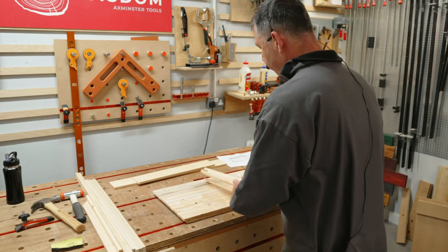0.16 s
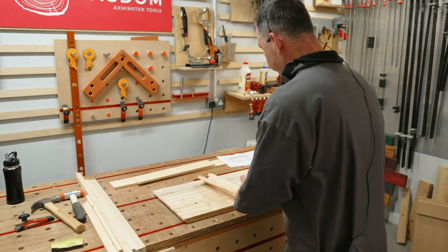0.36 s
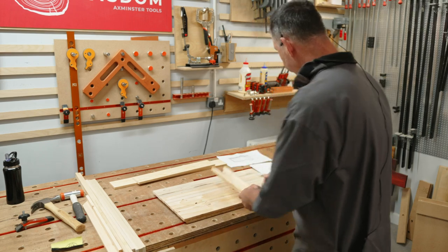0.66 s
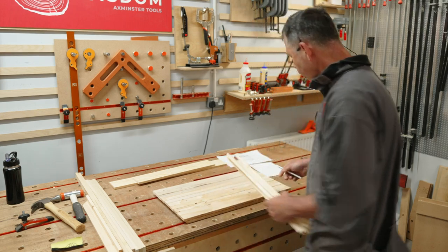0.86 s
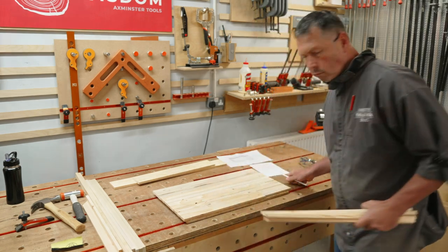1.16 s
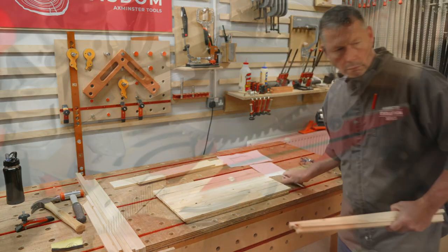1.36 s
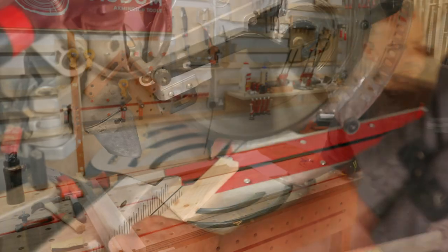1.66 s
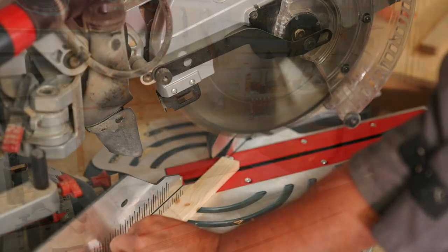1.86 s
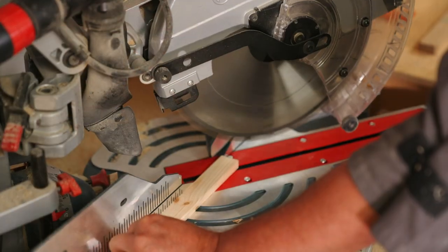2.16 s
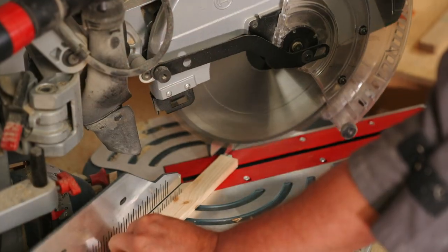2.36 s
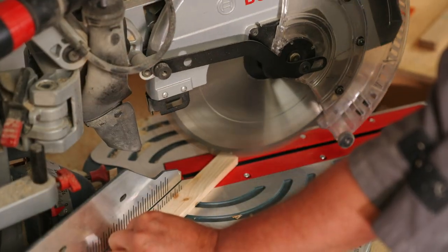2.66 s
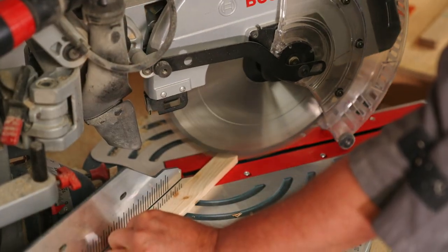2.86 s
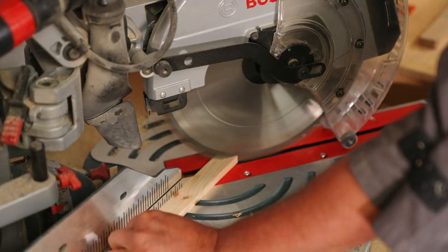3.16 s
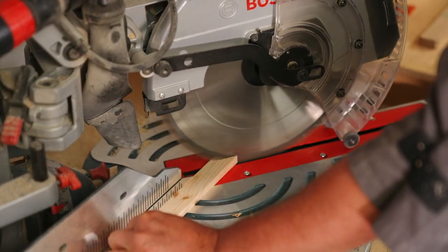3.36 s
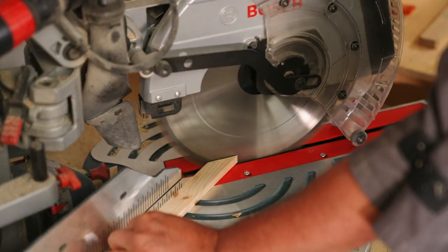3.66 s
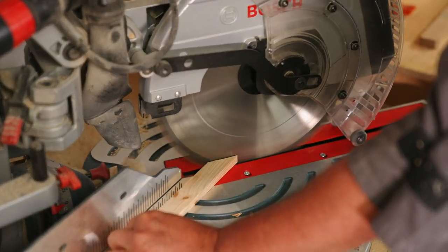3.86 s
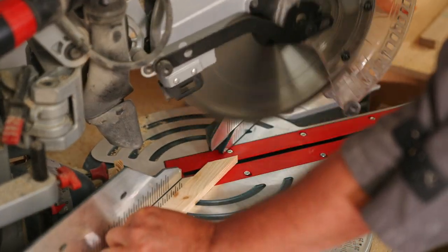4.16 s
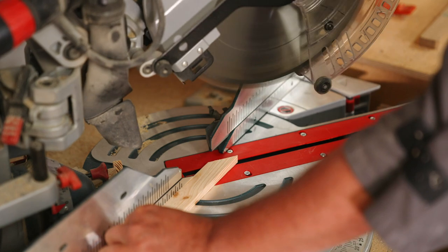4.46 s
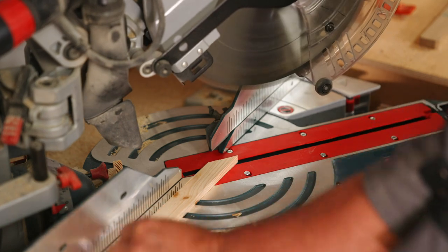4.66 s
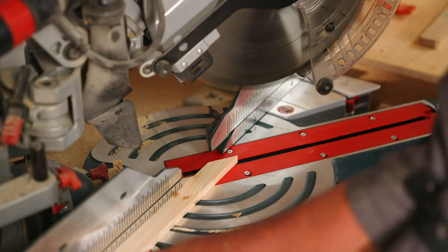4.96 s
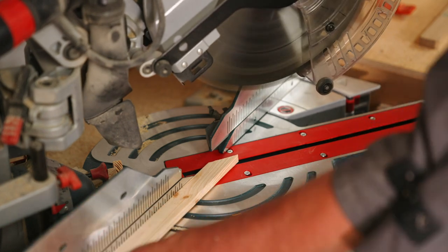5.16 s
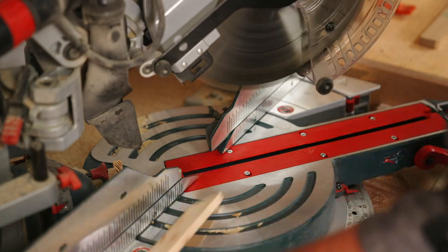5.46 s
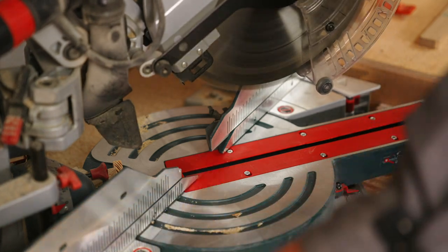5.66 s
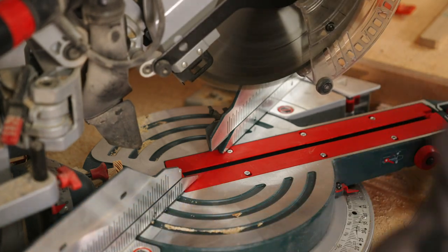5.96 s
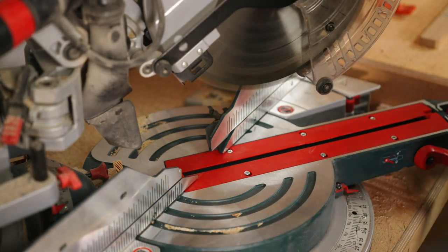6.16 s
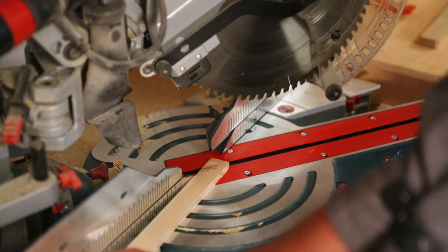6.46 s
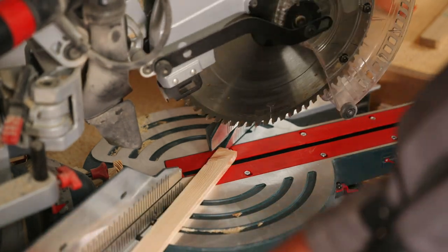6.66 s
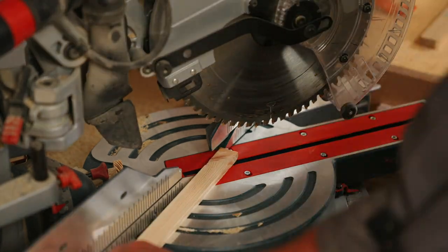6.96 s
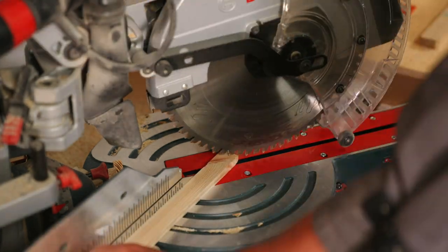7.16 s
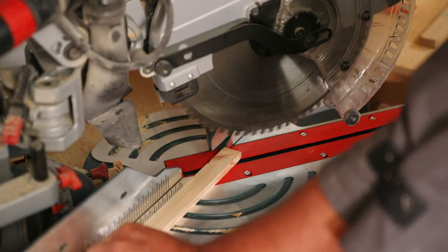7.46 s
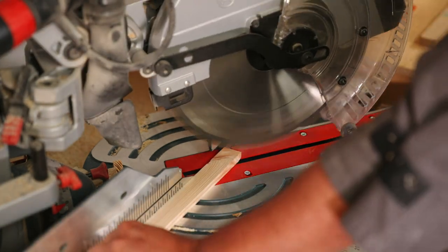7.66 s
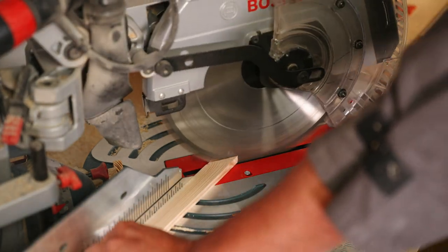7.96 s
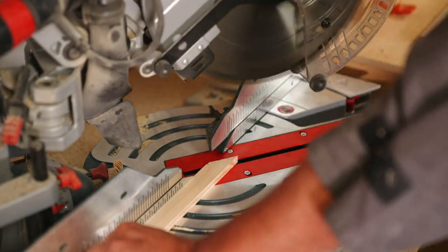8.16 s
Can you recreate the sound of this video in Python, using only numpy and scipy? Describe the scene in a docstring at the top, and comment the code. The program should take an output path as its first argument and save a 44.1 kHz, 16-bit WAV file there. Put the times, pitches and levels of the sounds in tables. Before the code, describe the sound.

In a small, lightly echoing workshop, wooden strips clack on a bench while shoes scuff and a jacket rustles. A dust extractor swells into a steady roar and a mitre saw grinds up to a whine. It bites through wood with a harsh bright rasp, runs free, then winds down. Dry clicks follow; abruptly everything races at five times speed, high-pitched, with another brief cut. The sound is identical in both channels, the loud saw audibly squashed.

```python
"""In a woodworking shop, wooden strips clatter on a bench and shoes scuff the floor as a dust extractor starts to roar.
A mitre saw spins up, bites through wood, runs free and winds down; gain control ducks loud sound at the saw.
Then everything plays five times as fast, as a time-lapse: the extractor, more clicks and a second cut.
Rotating parts are sums of lines that follow the blade's turns, air and friction are shaped noise, and
blows are short noise bursts or decaying modes."""
import sys
import numpy as np
from scipy import signal
from scipy.fft import rfft, irfft, next_fast_len
from scipy.io import wavfile
from scipy.ndimage import uniform_filter1d, minimum_filter1d

SR = 44100
rng = np.random.default_rng(int(sys.argv[2]) if len(sys.argv) > 2 else 0)


def file_out(sig):
    """Save sig as 16-bit WAV at sys.argv[1]."""
    # one column per channel
    cols = np.atleast_2d(sig).T
    # limit, then scale
    lim = np.clip(cols, -1, 1)
    pcm = np.round(lim * 32767).astype(np.int16)
    wavfile.write(sys.argv[1], SR, pcm)


N = 366030

LAPSE_AT, LAPSE_PACE = 6.257, 5  # s as heard, speed-up factor
LAPSED_S = LAPSE_PACE * (N / SR - LAPSE_AT)
T = np.arange(round((LAPSE_AT + LAPSED_S) * SR) + 8) / SR  # workshop time in s, before the speed-up

GEAR_TEETH, PINION_TEETH = 41, 5
ARMATURE = GEAR_TEETH / PINION_TEETH  # armature turns per blade turn
FREE_TURNS_PER_S = 62.15  # free speed of the blade
HUM_HZ = 100

# trigger holds, in s as heard, with levels of the starting noises: pressed_s, released_s, buzz_db, grind_db
RUNS = [(1.6689, 4.351, -12.5, -7.5), (7.552, 8.226, 1.5, 7.5)]


def rotation(drag, jitter=0.000505):
    """Rotational inertia: the blade's turns per s rise, sag late under load and coast down; their integral is turns."""
    spin_up_s, spin_up_shape = 0.621, 1.274
    coast_s, coast_shape = 0.497, 9.7
    share = np.zeros(len(T))
    for pressed, released, *_ in RUNS:
        on, off = workshop_time(pressed), workshop_time(released)
        spin_up = 1 - np.exp(-(np.maximum(T - on, 0) / spin_up_s) ** spin_up_shape)
        coast = (1 + np.maximum(T - off, 0) / (coast_s * coast_shape)) ** -coast_shape
        share += spin_up * coast
    sag = 1 - lagged(drag, lag_s=0.289)
    speed = FREE_TURNS_PER_S * share * sag * (1 + jitter * wander(18.0))
    return speed, np.cumsum(speed) / SR


def feed():
    """Loading by the workpiece: contact 0-1, strength of the cut, and a drag that grows through it."""
    # blade in the wood, in s as heard: enters_s, leaves_s, level_db, entering and leaving speed loss [share]
    wood_cuts = [(2.725, 3.745, 5, 0.05, .099), (7.772, 8.089, 7.5, 0.042, 0.15)]
    entry_s = 0.06  # the teeth sink in and come free over this time
    contact, strength, drag = np.zeros((3, len(T)))
    for enters, leaves, db, first_sag, last_sag in wood_cuts:
        start, end = workshop_time(enters), workshop_time(leaves)
        inside = np.clip(.5 + np.minimum(T - start, end - T) / entry_s, 0, 1)
        contact += inside
        strength += inside * gain_of(db + np.interp(T, [start, end], [0, -1]))  # quietens by 1 dB
        drag += inside * np.interp(T, [start, end], [first_sag, last_sag])
    return contact, strength, drag


def gear_loads(speed, cutting):
    """Tooth loading: shares of speeding up, cutting, running free, coasting fast and coasting slowly."""
    accel = uniform_filter1d(np.gradient(speed) * SR, size=4000)  # turns per s, per s
    rising = np.clip(accel / 14 - 1, 0, 1)
    braking = np.clip(-accel / 2, 0, 1)
    slow = np.clip(2 - speed / (0.24 * FREE_TURNS_PER_S), 0, 1)
    unloaded = 1 - cutting
    free = unloaded * (1 - rising - braking)
    coasting = unloaded * braking
    loads = np.array([unloaded * rising, cutting, free, coasting * (1 - slow), coasting * slow])
    return loads, rising, braking


def gears(speed, turns, cutting, runout=0.17, hunting=0.0074, coast_hunting=0.38, chatter_pulsing=0.28):
    """Gear-mesh excitation: mesh and fan lines pass the housing's resonances, with balance set by tooth load."""
    # relative line levels; fives are the gear mesh, eleven is the fan: multiple of the armature speed,
    # speeding_up_db, cutting_db, free_db, coasting_fast_db, coasting_slow_db
    whine_lines = [(5, -44.5, -47, -65, -38, -44.5), (6, -55, -74, -59, -56, -68),
                   (9.5, -64, -50, -50, -53, -76), (10, -45.5, -37, -38, -45, -42.5),
                   (11, -66, -46, -44, -49, -56), (15, -45.5, -44.5, -42, -42.5, -49),
                   (16, -61, -47, -75, -70, -52), (20, -50.5, -55, -54, -50, -42.5),
                   (25, -55, -66, -61, -68, -45.5), (30, -58, -69, -71, -64, -53)]
    # how well the housing radiates the whine: pitch_hz, level_db
    housing = [(200, -26), (440, 1), (580, 6.5), (700, -0.5), (830, 1), (1180, -1.5), (1380, -8),
               (1600, -4), (1870, 2.5), (2150, 0.5), (2500, -1.5), (3250, -5), (3750, -12), (4200, -4),
               (4620, 2), (4820, 6), (4980, -8.5), (5110, 8), (5350, 0.5), (5550, -5), (6200, 6),
               (7400, -2.5), (8700, 1), (10000, -8.5), (14000, -29)]
    # unloaded gears chatter in their backlash and ring the gear case: pitch_hz, relative level_db per Hz
    chatter_spectrum = [(100, -140), (1000, -100), (2200, -91), (2850, -70.5), (3500, -78), (4200, -89),
                        (4850, -71), (5500, -86), (7000, -85.5), (9000, -100)]
    loads, rising, braking = gear_loads(speed, cutting)
    free = loads[2]
    # cutting presses the gears together; unloaded they rattle and hunt in their backlash
    rough = np.dot([.3, .25, 1.8, .45, .45], loads)
    loose_turns = turns + hunting * (free + coast_hunting * braking) * wander(16.4)
    # gliding lines cross the room's nulls
    fading_db = 1.06 + 1.8 * (1 - cutting) * (rising + braking)
    whine = np.zeros(len(T))
    for multiple, *load_db in whine_lines:
        order = multiple * ARMATURE
        db = np.dot(load_db, loads) + read(housing, order * speed)[0]
        whine += partial(order * loose_turns, db, rough, flutter_hz=54.98, fading_db=fading_db, fading_hz=14)
    once_a_turn = np.sin(2 * np.pi * turns)
    chatter = noise(lambda hz, t: read(chatter_spectrum, hz)[0], len(T), patchy_db=-0.5)
    chatter *= (1 + chatter_pulsing * once_a_turn) * free * (speed / FREE_TURNS_PER_S) ** 4
    driven = loudness(speed, free_db=6.33, octave_db=5, faint_share=0.33)
    coasting = loudness(speed, free_db=5.2, octave_db=3.4, faint_share=0.18)
    level = (1 - braking) * driven + braking * coasting
    return (whine + chatter) * level * (1 + runout * once_a_turn)


def singing(speed, turns):
    """Plate resonance: the blade flares into a rough whistle as it speeds up through a critical speed."""
    critical, half_width = 47.5, 2.5  # turns per s
    nearness = np.exp(-np.minimum(((speed - critical) / half_width) ** 2, 50))
    speeding_up = np.gradient(lagged(speed, .1)) > 0
    whistle = partial(16 * ARMATURE * turns, db=-35, rough=1.8, flutter_hz=106.3)
    return nearness * speeding_up * whistle


def teeth(speed, turns, strength, wobble=0.17):
    """Periodic impact: left and right bevelled teeth strike in pairs, and blade slots add a comb of lines between."""
    # relative sound of the cut: pitch_hz, tooth_line_db, slot_line_db, rasp_db per Hz
    cut_spectrum = [(30, -90, -90, -135), (300, -75, -69, -110), (1610, -57, -62.5, -89.5),
                    (2150, -53.5, -64.5, -83.5), (4080, -48, -52, -86), (5560, -45, -56, -82.5),
                    (6200, -45.5, -46.5, -76), (8200, -44.5, -56, -74), (9820, -48.5, -64, -78.5),
                    (12000, -52, -79, -87), (14400, -53, -76, -95), (16000, -65, -78, -97)]
    blade_teeth, blade_slots = 72, 4
    full_speed = np.average(speed, weights=strength ** 2)
    biting = strength > 0
    cut_turns = turns[biting]
    lines = 0
    for order in range(7 * blade_slots, 4 * blade_teeth - 8 * blade_slots, blade_slots):
        tooth_db, slot_db, _ = read(cut_spectrum, order * full_speed)
        db = slot_db if order % (blade_teeth // 2) else tooth_db
        lines = lines + partial(order * cut_turns, db, rough=.7, flutter_hz=34, fading_db=4.5, fading_hz=9)
    rasp = noise(lambda hz, t: read(cut_spectrum, hz)[2], 4 * SR, patchy_db=3.0)
    rubbing = 1 + wobble * np.sin(2 * np.pi * cut_turns)  # the blade rubs harder once a turn
    out = np.zeros(len(T))
    out[biting] = lines + np.resize(rasp, len(lines)) * rubbing
    return out * strength


def air(speed, turns, throb=0.031, dulling_db=5):
    """Aerodynamic noise: blade and fan stir the air, duller at low speed and throbbing with each turn."""
    # relative spectrum of the stirred air: pitch_hz, level_db per Hz
    stirred_air = [(30, -145), (100, -117), (220, -100), (275, -86), (305, -81.5), (350, -82.5),
                   (690, -78.5), (950, -81.5), (1700, -82), (2350, -73), (2900, -72.5), (3400, -77),
                   (4300, -77), (4950, -74), (5800, -78), (7200, -79), (8200, -88.5), (15500, -101)]

    def colour(hz, t):
        slowness = 1 - np.interp(t, T, speed) / speed.max()
        return read(stirred_air, hz)[0] - dulling_db * slowness * np.log2(np.maximum(hz, 500) / 2500)
    rush = noise(colour, len(T), patchy_db=0.47)
    level = loudness(speed, free_db=10.7, octave_db=19, faint_share=0.08)
    return rush * level * (1 + throb * np.sin(2 * np.pi * turns))


def bearing(speed, turns):
    """Ball-pass vibration: the spindle bearing drones 5.3 times a turn and shows only near full speed."""
    return partial(5.3 * turns, db=-53.5, rough=.3, flutter_hz=5.4) * (speed / FREE_TURNS_PER_S) ** 4


def buzz(speed, pulsing=0.35):
    """Magnetic forces: a faint mains hum; at each start surging current makes iron buzz and gears grind upwards."""
    # relative spectrum of the starting motor: pitch_hz, level_db per Hz
    grind_spectrum = [(30, -135), (100, -105), (300, -85), (550, -73.5), (780, -69.5), (1300, -68.5),
                      (2200, -70), (3100, -75), (8000, -100)]
    # the motor's iron, one row per multiple of the hum: relative level_db
    iron_db = [-57.5, -52, -53, -47.5, -61, -43, -49.5, -51]
    # the starting current surges, fades and is switched over
    rise_s, fade_s, soft_start_s = 0.1, 0.42, 0.96
    out = gain_of(-82.5) * np.sqrt(2) * np.sin(2 * np.pi * HUM_HZ * T)
    t = T[:2 * SR]
    current = (1 - np.exp(-t / rise_s)) * np.exp(-t / fade_s)
    current *= np.clip((soft_start_s - t) / rise_s, 0, 1)
    for pressed, _, buzz_db, grind_db in RUNS:
        start = workshop_time(pressed)

        def colour(hz, s):
            # strongest in a 332 Hz wide band that climbs with the gear mesh
            mesh_hz = GEAR_TEETH * np.interp(start + s, T, speed)
            return read(grind_spectrum, hz)[0] + 9 * resonance(hz, mesh_hz, 332)
        iron = sum(partial((k + 1) * HUM_HZ * t, buzz_db + db, rough=0.069, flutter_hz=12,
                           fading_db=4.0, fading_hz=4.8) for k, db in enumerate(iron_db))
        grind = noise(colour, len(t), patchy_db=-0.5) * (1 + pulsing * np.cos(2 * np.pi * HUM_HZ * t))
        add(out, start, current * (iron + gain_of(grind_db) * grind))
    return out


def clicks():
    """Impact excitation: clacks and squeaks of switch, guard and workpiece sound the saw table's modes."""
    # start in s as heard, the rest in workshop time: start_s, level_db, centre_hz, spread [octaves], rise_s, t60_s
    click_events = [(1.686, -38.5, 2870, 1.5, 0.0053, 0.44), (1.689, -33, 5410, 0.067, 0.0044, 0.24),
                    (1.69, -29, 8400, 0.078, 0.0049, 0.088), (5.8533, -10.5, 4100, 1.3, 0.00071, 0.028),
                    (5.867, -12, 3950, 0.46, .0003, 0.011), (6.022, -12, 2850, 0.89, 0.00031, 0.029),
                    (6.452, -31.5, 800, 1.2, 0.022, 0.44), (6.741, -32, 720, 1.3, 0.0055, 0.32),
                    (6.956, -30, 1900, 0.62, 0.0044, 0.11), (7.097, -30, 1790, 0.77, .005, 0.11),
                    (8.149, -3, 4440, 0.79, .001, 0.04)]
    # saw table: pitch_hz, width_hz, level_db
    table_modes = [(1724, 130, 12), (2654, 37, 13), (3680, 270, 13), (4600, 400, 7.5), (6740, 450, 8),
                   (11300, 900, 4)]
    hz, out = np.fft.rfftfreq(8192, 1 / SR), np.zeros(len(T))
    table = gain_of(sum(db * resonance(hz, f, width) for f, width, db in table_modes))
    for s, db, centre_hz, spread, rise, t60 in click_events:
        octaves = np.log2((hz + 1) / centre_hz)
        colour = evened(table / (1 + (octaves / spread) ** 2) ** 1.6)
        add(out, workshop_time(s), gain_of(db) * burst(colour, rise, t60))
    return out


def knocked_strip():
    """Free vibration: a strip of wood knocked at the saw rings its modes."""
    # pitch_hz, level_db, t60_s
    strip_modes = [(368, -42, 0.28), (1720, -28.5, 0.084), (2560, -28, 0.12), (2940, -36, 0.087)]
    return ringing(5.8025, strip_modes)


def strips(ring_db=6.5):
    """Contact mechanics: soft blows of wood on wood sound only low modes, end-on blows the lengthwise ones."""
    # wood on wood: start_s, level_db, hardness as cutoff_hz, rise_s, rattle t60_s, end_on [share 0-1]
    knocks = [(0.078, -29.5, 895, 0.00044, 0.085, 0.1), (0.2705, -28.5, 8640, 0.0013, 0.032, 0.77),
              (0.274, -20.5, 1200, 0.0018, 0.06, 0.5), (0.2817, -32, 5000, .001, .04, 0.5),
              (0.2856, -11, 11040, 0.00034, .022, 0.4), (0.2931, -15.5, 5480, 0.00051, .05, 0.08),
              (0.305, -15, 4000, 0.00048, 0.027, 0), (0.3382, -16, 8950, .0002, 0.012, 0.38),
              (0.346, -17.5, 3100, 0.0013, 0.058, 0), (.517, -17.5, 550, 0.0037, 0.21, 0.01),
              (0.557, -32, 2300, .0015, 0.045, 0.2), (0.612, -34, 450, .002, 0.034, 0),
              (1.59, -30.5, 1360, 0.0013, .013, 0), (1.631, -16, 347, 0.0048, 0.02, 0.2)]
    # relative spectrum of a flat blow: pitch_hz, level_db per Hz
    wood_spectrum = [(88, -79), (150, -32), (300, -4.5), (400, -8.5), (505, -11.5), (690, -10.5),
                     (918, -12.5), (1320, -11), (1460, -12.5), (2750, -2), (3050, -4), (4460, -4.5),
                     (7210, -9), (15000, -28)]
    # its resonances: pitch_hz, width_hz, relative level_db
    wood_modes = [(1210, 95, -9), (1865, 56, 0.5), (2410, 25, -6), (2818, 24.7, 8), (3570, 530, -5.5),
                  (4290, 160, -2.5), (4760, 120, -3.5), (8600, 220, -3)]
    # ringing along the length, one row per multiple of the lowest mode: relative level_db
    lengthwise_db = [-3.5, -24, -2.5, 2, -4.5, 3, -13]
    # a long strip is set down and rings freely: pitch_hz, level_db, t60_s
    long_strip_modes = [(292.5, -49, 0.71), (2760, -57.5, 0.456), (3725, -60, 0.67), (6800, -56, 0.48)]
    lengthwise_hz, width_hz = 1185, 380
    hz, out = np.fft.rfftfreq(8192, 1 / SR), np.zeros(N)
    modes_db = sum(ring_db * gain_of(db / 2) * resonance(hz, f, width) for f, width, db in wood_modes)
    flat = evened(gain_of(read(wood_spectrum, hz)[0] + modes_db))
    lengthwise = evened(sum(gain_of(db) * resonance(hz, (k + 1) * lengthwise_hz, width_hz)
                            for k, db in enumerate(lengthwise_db)))
    for s, db, hard_hz, rise, t60, end_on in knocks:
        body = np.sqrt((1 - end_on) * flat ** 2 + end_on * lengthwise ** 2)
        softened = body / np.hypot(1, (hz / hard_hz) ** 2.02)
        add(out, s, gain_of(db) * burst(softened, rise, t60))
    return out + ringing(0.078, long_strip_modes)[:N]


def extractor():
    """Turbulence and resonance: rushing air sounds hose and hood, each resonance slowly waxing and waning."""
    # broad roar, relative: pitch_hz, level_db per Hz
    roar = [(15, -140), (50, -121), (100, -105), (170, -90), (230, -85.5), (400, -81), (850, -81),
            (1900, -84), (3000, -83), (5000, -81), (8800, -80.5), (10000, -88), (12500, -95.5),
            (15500, -105)]
    # resonances of hose and hood: pitch_hz, width_hz, mean level_db over the roar
    hose = [(429, 58, 9), (526, 53, 8.5), (614.4, 58, 10.5), (1066, 56, 11), (1180, 45, 9), (1475, 31, 10),
            (1593, 97, 12), (1724, 50, 8), (1870, 100, 12), (2060, 120, 7), (2275, 95, 6), (2590, 140, 9),
            (2850, 90, 2.5), (3590, 80, 5), (6500, 260, 5.5), (8100, 1400, 2.5)]
    on_s, rise_s, swell_db_per_s = 1.543, 0.91, 0.08
    drift, drift_hz = .2, .15

    def colour(hz, t):
        peaks_db = np.hstack([db * resonance(hz, f, width) for f, width, db in hose])
        phases = rng.random((len(hose), 1))
        hose_db = peaks_db @ (1 + drift * np.sin(2 * np.pi * (drift_hz * t + phases)))
        return read(roar, hz)[0] + hose_db
    draw = 1 - np.exp(-np.maximum(T - on_s, 0) / rise_s)
    level = gain_of(0.74 + swell_db_per_s * (T - on_s))  # keeps growing slowly
    return noise(colour, len(T), patchy_db=1.4, ripple_db=2.5, count=2048) * level * draw


def shuffling():
    """Friction noise: shoes scuff the floor, a jacket rustles and a strip scrapes over the bench."""
    # relative spectra: pitch_hz, level_db per Hz
    shoe_spectrum = [(20, -108), (55, -110.5), (100, -81), (160, -79), (240, -85.5), (400, -82.5),
                     (550, -92.5), (1000, -98), (1500, -107), (4000, -125)]
    cloth_spectrum = [(100, -108), (500, -99), (1500, -102), (4000, -103), (7500, -101), (10000, -109),
                      (15500, -118)]
    scrape_spectrum = [(400, -105), (560, -85), (624, -72), (700, -93), (950, -94), (1080, -86),
                       (1200, -95), (1600, -120)]
    # movements of shoes, jacket and strip: centre_s, half_length_s, level_db
    steps = [(.02, 0.03, -5), (.125, 0.082, -0.5), (.45, 0.025, -2), (.57, 0.036, 5.5), (.68, 0.023, -16),
             (.8, 0.24, -8), (1.09, 0.052, 4.5), (1.2, 0.039, 5.5), (1.35, 0.065, 4), (1.55, 0.016, 1),
             (1.65, 0.1, 0.5), (2.0, 0.28, -9)]
    rustles = [(.125, 0.039, 6.5), (.532, 0.038, 12), (.6, 0.46, -1), (.81, 0.047, 1), (1.3, 0.5, -9.5)]
    scrapes = [(.015, .045, 2.5)]
    shoes = noise(lambda hz, t: read(shoe_spectrum, hz)[0], N, patchy_db=2.5)
    cloth = noise(lambda hz, t: read(cloth_spectrum, hz)[0], N, patchy_db=0.5)
    scrape = noise(lambda hz, t: read(scrape_spectrum, hz)[0], N, patchy_db=-0.5, ripple_db=2.0)
    return shoes * swells(steps) + cloth * swells(rustles) + scrape * swells(scrapes)


def room(x):
    """Reverberation: dense reflections decay exponentially, at a rate set by frequency."""
    # pitch_hz, t60_s
    decay = [(150, 0.33), (1000, 0.44), (4000, 0.28), (8000, 0.28), (15000, 0.26)]
    taps = rng.standard_normal(SR // 2) * (T[:SR // 2] > .004)
    hz, t, z = signal.stft(taps, SR, nperseg=256)
    t60 = read(decay, hz)[0][:, None]
    tail = signal.istft(z * gain_of(-60 * t / t60), SR, nperseg=256)[1]
    return signal.oaconvolve(x, tail / np.linalg.norm(tail))[:len(x)]


def gain_control(x):
    """Dynamic compression: turns loud sound down at once, holds, then recovers slowly."""
    limit_db, ratio = -34, 8.7
    detect_s, lookahead_s, hold_s, recover_db_per_s = 0.01, 0.0031, 0.074, 19
    level_db = 10 * np.log10(lagged(x ** 2, detect_s))
    over_db = np.maximum(level_db - limit_db, 0) * (1 - 1 / ratio)
    half = int(hold_s * SR / 2)
    held_db = -minimum_filter1d(-over_db, 2 * half + 1, origin=half)
    recovery_db = T * recover_db_per_s
    duck_db = np.maximum.accumulate(held_db + recovery_db) - recovery_db
    return x * gain_of(-np.interp(T + lookahead_s, T, duck_db))


def time_lapse(x):
    """Time compression: from LAPSE_AT on the sound plays faster and proportionally higher."""
    cut = round(LAPSE_AT * SR)
    return np.r_[x[:cut], signal.resample_poly(x[cut:], 1, LAPSE_PACE)][:N]


def workshop_time(s):
    """Time scaling: the workshop time of a moment that is heard at s."""
    return s + (LAPSE_PACE - 1) * max(s - LAPSE_AT, 0)


def partial(turns, db, rough, flutter_hz, fading_db=0, fading_hz=22):
    """Modulated line of a periodic source: quick flutter in strength and phase, and swells and dropouts."""
    def chance(rate):
        return np.interp(T[:len(turns)] * rate, np.arange(4096), rng.standard_normal(4096))
    in_phase, quadrature = rough * chance(2 * flutter_hz), rough * chance(2 * flutter_hz)
    angle = 2 * np.pi * (turns % 1)
    line = (1 + in_phase) * np.cos(angle) + quadrature * np.sin(angle)
    return gain_of(db + fading_db * chance(fading_hz)) * line / np.sqrt(.5 + rough ** 2)


def noise(colour, size, patchy_db, ripple_db=3.0, count=1024):
    """Turbulent noise: white noise filtered to the density colour(Hz, s) in dB per Hz, with random unevenness."""
    overlap = count * 3 // 4
    white = rng.standard_normal(size) * np.sqrt(SR / 2)
    hz, t, z = signal.stft(white, SR, nperseg=count, noverlap=overlap)
    hz = hz[:, None]
    patches = uniform_filter1d(rng.standard_normal(z.shape), size=10, axis=0)
    patches = evened(uniform_filter1d(patches, size=8, axis=1))
    ripple = rng.standard_normal(hz.shape) * np.clip(hz / 1000, 0, 1)  # standing waves of the room
    z = z * gain_of(colour(hz, t) + patchy_db * patches + ripple_db * ripple)
    return signal.istft(z, SR, nperseg=count, noverlap=overlap)[1][:size]


def burst(colour, rise, t60):
    """Minimum-phase response: a dying rattle of contacts is coloured with no sound before the blow."""
    size = 2 * (len(colour) - 1)
    log_gain = np.log(np.maximum(np.r_[colour, colour[-2:0:-1]], 1e-4))
    response = np.fft.ifft(np.exp(np.conj(signal.hilbert(log_gain)))).real
    envelope = (1 - np.exp(-T[:size] / rise)) * gain_of(-60 * T[:size] / t60)
    return signal.fftconvolve(rng.standard_normal(size) * envelope, response)


def ringing(s, modes, twin=0.4, split=0.0035):
    """Modal decay with beating: a soft blow at time s rings modes of a loose strip, each a close pair."""
    out, t = np.zeros(len(T)), T[:SR // 2]
    ring = 0
    for hz, db, t60 in modes:
        pair = np.sin(2 * np.pi * hz * t) + twin * np.cos(2 * np.pi * hz * (1 + split) * t)
        ring = ring + gain_of(db - 60 * t / t60) * pair
    add(out, s, ring / np.hypot(1, twin) * (1 - np.exp(-t / .002)))
    return out


def loudness(speed, free_db, octave_db, faint_share):
    """Power law of a rotating source: gain grows by octave_db per octave of speed, dying near standstill."""
    share = speed / FREE_TURNS_PER_S + 1e-6
    return gain_of(free_db + octave_db * np.log2(share)) / (1 + (faint_share / share) ** 6)


def resonance(hz, centre_hz, width_hz):
    """Resonance curve of peak 1 and the given width at half height."""
    return 1 / (1 + (2 * (hz - centre_hz) / width_hz) ** 2)


def swells(rows):
    """Incoherent power sum of bell-shaped swells, as a gain."""
    return np.sqrt(sum(gain_of(2 * db) * np.exp(-np.minimum(((T[:N] - s) / half) ** 2, 50))
                       for s, half, db in rows))


def lagged(x, lag_s):
    """First-order lag: follows x with a time constant."""
    keep = np.exp(-1 / (lag_s * SR))
    return signal.lfilter([1 - keep], [1, -keep], x + 1e-20)


def wander(rate_hz):
    """Band-limited random process of rms 1."""
    size = next_fast_len(len(T))
    hz = np.fft.rfftfreq(size, 1 / SR)
    smooth = rfft(rng.standard_normal(size)) * np.exp(-(hz / rate_hz) ** 2)
    return evened(irfft(smooth, size))[:len(T)]


def gain_of(db):
    """Logarithmic level: decibels to amplitude gain."""
    return 10 ** (np.asarray(db) / 20)


def evened(x):
    """Power normalisation: scales to rms 1."""
    return x / np.sqrt(np.mean(x ** 2) + 1e-20)


def read(rows, hz):
    """Logarithmic frequency interpolation of every column of a spectrum table."""
    f, *columns = np.transpose(rows)
    return [np.interp(np.log(hz + 1), np.log(f + 1), c) for c in columns]


def add(mix, s, sound):
    """Linear superposition: adds a sound at time s."""
    part = mix[round(s * SR):][:len(sound)]
    part += sound[:len(part)]


def scene(whine_echo_db=-6, click_echo_db=-16, wood_echo_db=-8):
    """Superposition: the bench, plus the saw through gain control and time-lapse, alike in both channels."""
    contact, strength, drag = feed()
    speed, turns = rotation(drag)
    cutting = lagged(contact, lag_s=0.042)  # the gears take up and shed their load
    whine = gears(speed, turns, cutting) + singing(speed, turns)
    wood = strips()
    clacks = clicks() + knocked_strip()
    saw = whine + clacks + teeth(speed, turns, strength) + air(speed, turns)
    saw += bearing(speed, turns) + buzz(speed) + extractor()
    echo = room(gain_of(whine_echo_db) * whine + gain_of(click_echo_db) * clacks)
    bench = wood + gain_of(wood_echo_db) * room(wood) + shuffling()
    mono = bench + time_lapse(gain_control(saw + echo))
    return np.array([mono, mono])


def record(dry):
    """Band limitation: the recorder passes only sound below about 15.75 kHz."""
    low_pass = signal.firwin(511, 15750, window=("kaiser", 9), fs=SR)
    return signal.oaconvolve(dry, low_pass[None], "same")


dry = scene()
out = record(dry)
file_out(out)
```